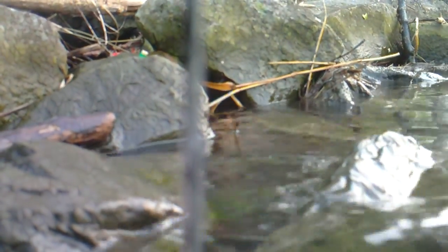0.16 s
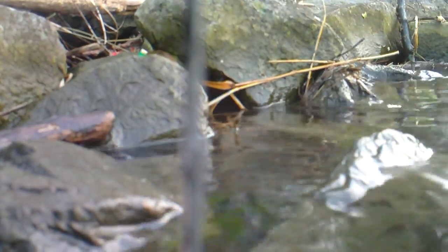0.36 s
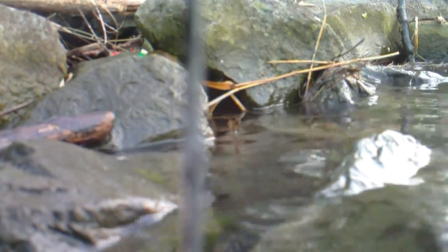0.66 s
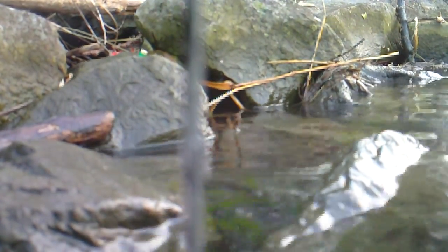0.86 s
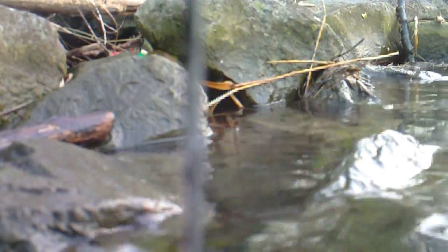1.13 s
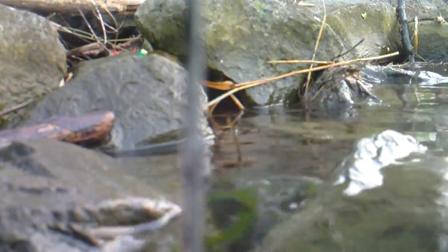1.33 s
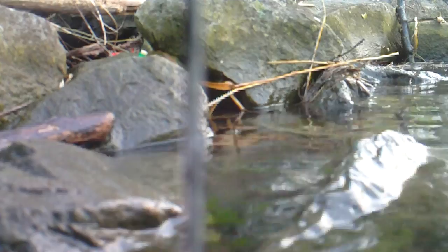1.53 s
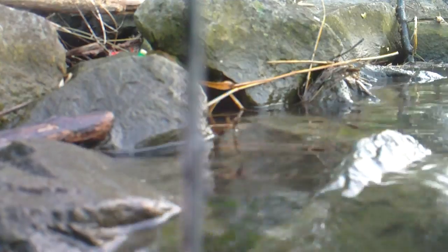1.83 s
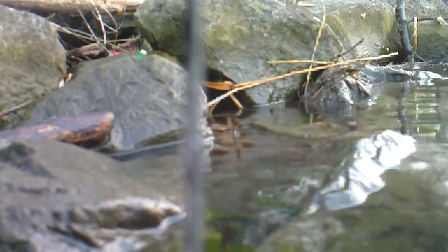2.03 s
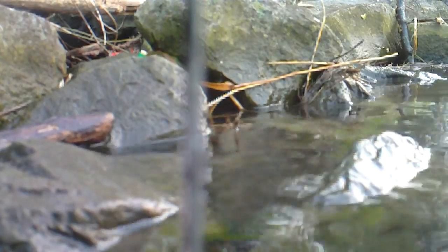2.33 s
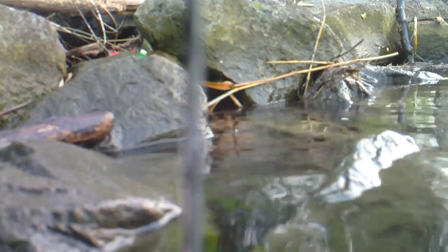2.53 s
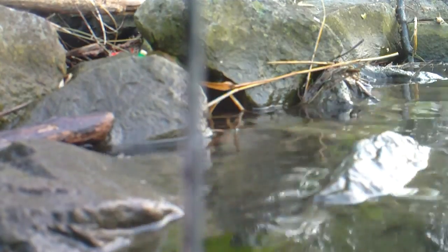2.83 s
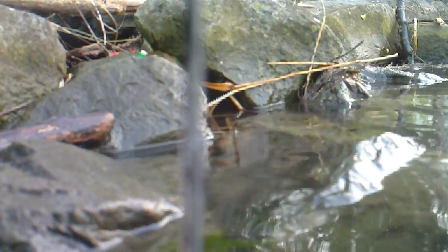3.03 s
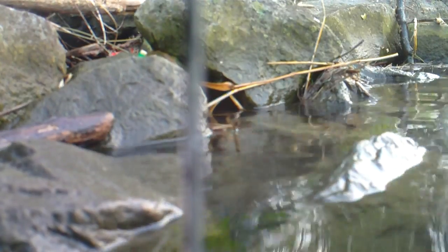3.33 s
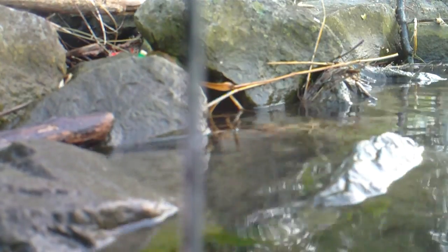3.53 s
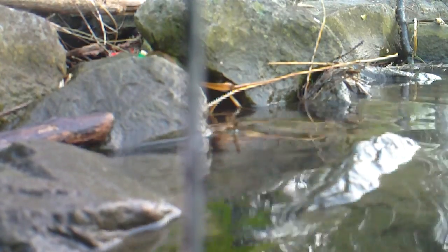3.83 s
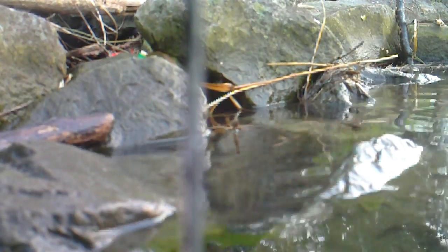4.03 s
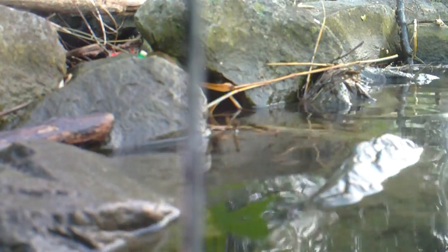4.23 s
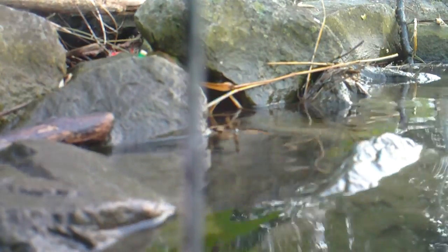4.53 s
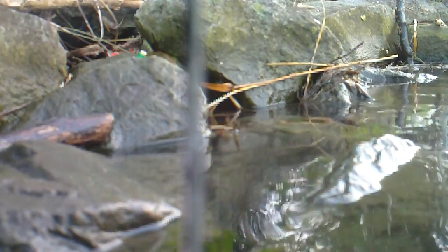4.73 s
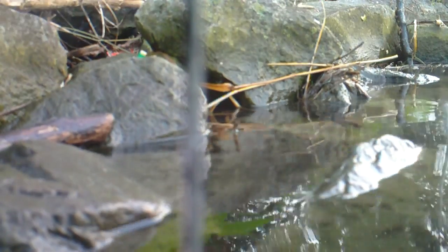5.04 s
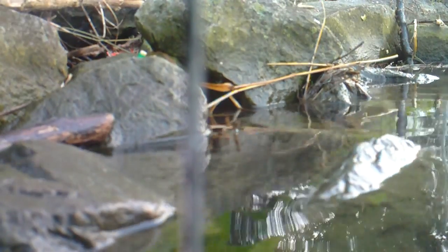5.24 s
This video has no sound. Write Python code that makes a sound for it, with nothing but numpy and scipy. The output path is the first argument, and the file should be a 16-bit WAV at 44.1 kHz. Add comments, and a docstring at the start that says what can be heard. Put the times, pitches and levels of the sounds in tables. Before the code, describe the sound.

A high electronic whine holds one pitch close by, fluttering slightly and ticking faintly. Under open air with a low rumble, nearby water laps unevenly among rocks, plopping, gurgling and splashing, with a few tiny bubble plinks. The waves get stronger around the middle as a faint low hum rises far off. Late on, a hollow float bumps the stones with a quick gulp of water, and the lapping settles.

```python
"""Small waves lap at a rocky bank: big bubbles gurgle, small ones splash and fizz as spray.
Slaps trap pockets of air, single bubbles plink, drops tick on stone.
Late on, a hollow float knocks against the bank and the water gulps shut behind it.
Close by, electronics whine near 1.6 kHz, with brief surges and faint ticking.
Behind lie a low outdoor rumble and, in the second half, a distant hum."""
import sys
import numpy as np
from scipy import signal
from scipy.io import wavfile
from scipy.ndimage import uniform_filter1d

SR = 44100
rng = np.random.default_rng(int(sys.argv[2]) if len(sys.argv) > 2 else 0)


def unload_audio(sound):
    """Save the sound as a 16-bit wav file, at the path given as the first command line argument."""
    columns = np.transpose(np.atleast_2d(sound))
    # keep every value between -1 and 1, then stretch to whole-number steps
    steps = np.round(np.clip(columns, -1, 1) * 32767)
    wavfile.write(sys.argv[1], SR, steps.astype(np.int16))


N = 237699
TIME_S = np.arange(N) / SR

# waves at the bank: (crest [s], length [s], gurgle [dB], splash [dB], spray [dB])
WAVES = [(0.84, 0.12, -42, -72, -69), (1.002, 0.034, -50, -54.5, -61), (1.093, 0.32, -40.5, -69, -66),
         (1.616, 0.55, -41.5, -66, -66), (2.011, 0.17, -40, -61, -60.5), (2.161, 0.098, -32, -59.5, -56),
         (2.383, 0.32, -39.5, -62, -61), (2.59, 0.18, -40, -62, -62), (2.803, 0.24, -34.5, -52, -58.5),
         (2.902, 0.11, -29, -45, -44), (3.023, 0.094, -34, -53, -53.5), (3.135, 0.6, -42, -58.5, -61.5),
         (3.433, 0.2, -37, -56, -62), (3.53, 0.1, -35.5, -46, -47.5), (3.584, 0.058, -28, -61, -61),
         (3.823, 0.083, -38, -53, -48), (3.866, 0.13, -25.5, -47.5, -51.5), (4.063, 0.061, -34, -56, -60),
         (4.184, 0.34, -44, -62, -65), (4.313, 0.12, -34, -52.5, -47.5), (4.407, 0.15, -37, -52.5, -54.5),
         (4.638, 0.057, -25.5, -55, -63)]
# water between waves: (gurgle [dB], splash [dB], spray [dB])
CALM_DB = (-54.5, -75.5, -80.5)
# bubble spectra: (frequency [Hz], relative density [dB])
GURGLE_SPECTRUM = [(130, -0.5), (220, -2.5), (400, 3), (580, -0.5), (850, -12.5), (1300, -29.5),
                   (1800, -27), (2300, -17.5), (3200, -60)]
SPLASH_SPECTRUM = [(900, 6), (1400, -1), (2200, -2.5), (2900, 0.5), (4000, 4.5), (4900, -8.5), (5700, -8),
                   (7500, -8.5)]
SPRAY_SPECTRUM = [(4500, -3), (6000, -13), (7800, -0.5), (9800, -5.5), (11500, -1), (13000, 2),
                  (15500, -19)]
# hollows between stones: (centre [Hz], width [Hz], added gain [ratio])
HOLLOWS = [(1110, 62, 0.46), (1270, 40, 1.7), (2136, 160, 1.03), (4920, 260, 0.6), (9130, 590, 0.28)]
# whine harmonics: (multiple [ratio], level [dB])
WHINE_HARMONICS = [(1, -36), (2, -51.5), (3, -71), (4, -74.5), (5, -75), (6, -74)]
# whine surges: (time [s])
SURGES_S = [0.277, 0.563, 0.763, 1.022, 1.071, 1.378, 1.825, 2.168, 2.258, 2.586, 2.935, 3.055, 4.836,
            4.947, 5.187]
# thin tones beside the whine: (frequency [Hz], level [dB])
THIN_TONES = [(8079, -71.5), (11089, -61)]
# outdoor air: (frequency [Hz], relative band gain [dB])
RUMBLE_SPECTRUM = [(20, -15.5), (40, -0.5), (80, -2.5), (130, -11), (300, -16), (600, -26), (1200, -31),
                   (2300, -37.5), (3700, -43.5), (6000, -46), (8500, -45.5), (10500, -39), (12500, -44),
                   (15500, -48)]
# slaps trapping air: (time [s], level [dB], pocket pitch [Hz])
SLAPS = [(0.765, -29, 493), (0.825, -22.5, 416), (1.604, -28, 550), (1.652, -27, 382), (2.076, -26.5, 416),
         (2.128, -20.5, 353), (2.16, -15, 290), (2.804, -16, 423), (2.851, -19, 513), (2.884, -28, 480),
         (3.039, -31, 437), (3.069, -20.5, 410), (3.101, -23, 534), (3.346, -19.5, 500), (3.378, -20, 464),
         (3.403, -22, 340), (3.54, -20, 570), (3.588, -12, 550), (3.858, -19, 336), (3.869, -14, 487),
         (4.056, -23.5, 416), (4.275, -21.5, 527), (4.296, -30, 452), (4.606, -16, 490),
         (4.623, -13.5, 377)]
# single bubbles: (time [s], level [dB], pitch [Hz])
PLINKS = [(0.995, -35, 4400), (2.798, -31, 3650), (2.861, -26, 4720), (2.869, -28, 4700),
          (2.88, -22.5, 4630), (2.905, -28, 4800), (2.998, -34, 2160), (3.069, -27, 3300),
          (3.345, -28.5, 910), (3.439, -32, 1900), (3.516, -30, 2210), (3.897, -24.5, 1300)]
# drops on stone: (time [s], level [dB])
DROPS = [(1.2057, -36), (1.2794, -37), (1.3766, -36.5), (1.4421, -33.5), (2.904, -30.5), (2.9806, -30),
         (2.9971, -25), (3.0678, -22.5), (3.1265, -31), (3.1387, -33), (4.1455, -30), (4.2132, -36),
         (4.3807, -25), (4.5052, -34), (4.6052, -34)]
# distant hum: (time [s], level [dB])
HUM_CURVE = [(2.6, -75), (3.3, -55), (4.3, -48.5), (4.8, -46), (5.39, -49)]
# float contacts: (time [s], level [dB], hardness cutoff [Hz])
KNOCKS = [(4.621, -16.5, 500), (4.628, -21, 1810), (4.6364, -16.5, 2000), (4.642, -37, 2020),
          (4.661, -17, 660)]
# hollow float body: (frequency [Hz], gain [dB], t60 [s])
FLOAT_MODES = [(94, -4.5, 0.13), (170, -6, 0.1), (300, -1.5, 0.14), (395, -6.5, 0.028), (655, 1.5, 0.014),
               (930, -7.5, 0.02), (1154, -2.5, 0.023), (1874, -10.5, 0.026), (2110, -10.5, 0.017)]
# cavities behind the float: (time [s], level [dB], start pitch [Hz], initial fall [Hz/s], t60 [s])
GULPS = [(4.660, -11.5, 331, 3020, .12), (4.689, -15, 278, 4000, 0.043)]


def from_db(db):
    """Decibels to gain."""
    return 10 ** (np.asarray(db) / 20)


def unit_rms(x):
    """Scale to rms 1."""
    return x / np.sqrt(np.mean(x ** 2) + 1e-20)


def db_at(spectrum, hz):
    """Read a spectrum on a log-frequency axis."""
    points_hz, points_db = np.transpose(spectrum)
    return np.interp(np.log(hz), np.log(points_hz), points_db)


def drift(rate_hz):
    """Slow random wander, rms about 1."""
    hop, settle = 40, 2000
    pole = np.exp(-2 * np.pi * rate_hz * hop / SR)
    noise = rng.standard_normal(N // hop + settle + 2)
    slow = signal.lfilter([1], [1, -2 * pole, pole ** 2], noise)[settle:]
    return np.interp(np.arange(N) / hop, np.arange(len(slow)), unit_rms(slow))


def filtered(x, hz, kind, order=2):
    """Causal Butterworth filter."""
    sos = signal.butter(order, np.clip(hz, 10, .45 * SR), kind, fs=SR, output="sos")
    return signal.sosfilt(sos, x + 1e-18)


def ring(clicks, hz, t60_s):
    """Resonator: a unit click starts a decaying unit sine."""
    r, w = 1000 ** (-1 / (t60_s * SR)), 2 * np.pi * hz / SR
    return signal.lfilter([0, np.sin(w)], [1, -2 * r * np.cos(w), r * r], clicks + 1e-18)


def tone(hz, rms_db, wander_hz):
    """Sine with slight pitch wander."""
    pitch_hz = hz + wander_hz * drift(1.8)
    return np.sqrt(2) * from_db(rms_db) * np.sin(2 * np.pi * np.cumsum(pitch_hz) / SR)


def add(out, start_s, sound):
    """Mix a short sound in at start_s."""
    i = round(start_s * SR)
    out[i:i + len(sound)] += sound[:N - i]


def bubbles(spectrum, per_s, spread_db, t60_cycles, swarm_db, pitches):
    """Bubbles of random strength and timing ring, each pitch in swarms; rms 1."""
    out = 0
    for hz in np.geomspace(spectrum[0][0], spectrum[-1][0], pitches):
        strength = from_db(spread_db * np.minimum(rng.exponential(1, N), 3)) * rng.choice([-1, 1], N)
        born = rng.random(N) < per_s / pitches / SR
        swarm = from_db(swarm_db * np.clip(drift(12), -2, 1.5))
        rings = filtered(ring(strength * born * swarm, hz, t60_cycles / hz), hz / 2, "high")
        out += from_db(db_at(spectrum, hz)) * np.sqrt(hz) * unit_rms(rings)
    return unit_rms(out)


def wave_envelope(crest_s, length_s, build_share=0.55, edge_db=-15):
    """One wave builds to gain 1 at its crest, then drains."""
    phase = (TIME_S - crest_s) / length_s
    return from_db(edge_db * np.maximum(-phase / build_share, phase / (1 - build_share)))


def lapping(gurgle_db=-1, splash_db=4.5, spray_db=7):
    """Big bubbles gurgle with each wave; small ones splash and fizz where it breaks."""
    power = from_db(CALM_DB)[:, None] ** 2
    for crest_s, length_s, *levels_db in WAVES:
        power = power + np.outer(from_db(levels_db), wave_envelope(crest_s, length_s)) ** 2
    gurgle, splash, spray = np.sqrt(power)
    gurgle *= bubbles(GURGLE_SPECTRUM, per_s=1800, spread_db=2, t60_cycles=10.8, swarm_db=-.5, pitches=16)
    splash *= bubbles(SPLASH_SPECTRUM, per_s=3200, spread_db=3.5, t60_cycles=22, swarm_db=2, pitches=16)
    spray *= bubbles(SPRAY_SPECTRUM, per_s=5000, spread_db=4.2, t60_cycles=24, swarm_db=3, pitches=14)
    return from_db(gurgle_db) * gurgle + from_db(splash_db) * splash + from_db(spray_db) * spray


def hollows(water):
    """Gaps in the bank resonate with the water."""
    out = water
    for hz, width_hz, gain in HOLLOWS:
        r, w = np.exp(-np.pi * width_hz / SR), 2 * np.pi * hz / SR
        resonance = signal.lfilter([1, 0, -1], [1, -2 * r * np.cos(w), r * r], water)
        out = out + gain * (1 - r * r) / 2 * resonance
    return out


def whine(pitch_hz=1602.6, surge_s=0.021, surge_db=1.63, flutter_db=0.42, swell_db=1):
    """Electronics: clock-steady harmonics flutter and surge in level, beside two unrelated tones."""
    surging = sum((TIME_S > start_s) & (TIME_S < start_s + surge_s) for start_s in SURGES_S)
    surge = uniform_filter1d(surging.astype(float), size=200)
    drive = from_db(surge_db * surge + flutter_db * drift(45))
    octave_db = swell_db * drift(2.8)
    harmonics = 0
    for multiple, db in WHINE_HARMONICS:
        amplitude = np.sqrt(2) * from_db(db + octave_db * (multiple == 2))
        harmonics += amplitude * np.sin(2 * np.pi * (multiple * pitch_hz * TIME_S + rng.random()))
    return drive * harmonics + sum(tone(hz, db, wander_hz=0.15) for hz, db in THIN_TONES)


def ticking(per_s=38, tick_db=-56, uneven_db=5, rebound_s=0.00373):
    """Ticks of uneven strength ring the device's housing; each rebounds once."""
    onsets = (np.arange(0, N / SR, 1 / per_s) * SR).astype(int)
    clicks = np.zeros(N)
    clicks[onsets] = from_db(tick_db + uneven_db * np.clip(rng.standard_normal(len(onsets)), -2, 1))
    clicks += .5 * np.roll(clicks, round(rebound_s * SR))
    return (ring(clicks, hz=2050, t60_s=.007) - ring(clicks, hz=2420, t60_s=.009)
            + ring(clicks, hz=2830, t60_s=.014))


def rumble(rms_db=-39.5, waver_db=2.5):
    """Outdoor noise in half-octave bands: wavering lows thin to a faint, steady hiss."""
    edges_hz = 20 * 2 ** np.arange(0, 10.1, .5)
    white = rng.standard_normal((2, N))
    air = 0
    for k, (low_hz, high_hz) in enumerate(zip(edges_hz, edges_hz[1:])):
        band_db = db_at(RUMBLE_SPECTRUM, np.sqrt(low_hz * high_hz))
        gain = from_db(band_db + waver_db * drift(14.4) * (low_hz < 1000))
        air += gain * filtered(white[k % 2], [low_hz, high_hz], "band", order=3)
    return from_db(rms_db) * unit_rms(air)


def slaps(gain_db=5, rise_s=0.00079, glide_per_s=1.5, churn_db=-17, churn_s=0.0049, cutoff_hz=1000):
    """A trapped air pocket rings, rising in pitch, under a burst of churned water."""
    out, t = np.zeros(N), TIME_S[:SR // 10]
    ref_cycles, ref_db, halving_db = 8.1, -21, 15
    for start_s, db, hz in SLAPS:
        t60_cycles = ref_cycles * 2 ** ((ref_db - db) / halving_db)  # harder slaps break up sooner
        pocket = np.sin(2 * np.pi * hz * t * (1 + glide_per_s * t)) * from_db(-60 * t * hz / t60_cycles)
        churn = unit_rms(filtered(rng.standard_normal(len(t)), [250, 1000], "band"))
        churn *= from_db(churn_db) * np.exp(-t / churn_s)
        attack = 1 - np.exp(-t / rise_s)
        add(out, start_s, from_db(db + gain_db) * attack * (pocket + churn))
    return filtered(out, cutoff_hz, "low")


def plinks(gain_db=-1, t60_cycles=34):
    """Single small bubbles ring briefly."""
    out, click = np.zeros(N), signal.unit_impulse(SR // 20)
    for start_s, db, hz in PLINKS:
        add(out, start_s, from_db(db + gain_db) * ring(click, hz, t60_cycles / hz))
    return out


def drops(gain_db=-4, rise_s=0.00051, decay_s=0.0032, highpass_hz=6500):
    """Drops hit stone: short, bright noise bursts."""
    out, t = np.zeros(N), TIME_S[:SR // 20]
    envelope = (1 - np.exp(-t / rise_s)) * np.exp(-t / decay_s)
    for start_s, db in DROPS:
        noise = unit_rms(filtered(rng.standard_normal(len(t)), highpass_hz, "high", order=1))
        add(out, start_s, from_db(db + gain_db) * envelope * noise)
    return out


def distant_hum(pitch_hz=176.4):
    """A far, slightly wavering tone comes up."""
    level_db = np.interp(TIME_S, *np.transpose(HUM_CURVE))
    return tone(pitch_hz, level_db + drift(1), wander_hz=0.83)


def float_knocks(scatter_db=1):
    """The float bumps the bank and rebounds; harder contacts reach its higher modes."""
    out, click = np.zeros(N), signal.unit_impulse(SR // 3)
    for start_s, db, hardness_hz in KNOCKS:
        body = 0
        for k, (hz, mode_db, t60_s) in enumerate(FLOAT_MODES):
            body += (-1) ** k * from_db(mode_db + rng.normal(0, scatter_db)) * ring(click, hz, t60_s)
        add(out, start_s, from_db(db) * filtered(body, hardness_hz, "low"))
    return out


def gulps(rise_s=0.0053):
    """Water closes behind the float; a cavity widens as it rings, so its pitch falls."""
    out, t = np.zeros(N), TIME_S[:SR // 5]
    for start_s, db, start_hz, fall_hz_per_s, t60_s in GULPS:
        pitch_hz = start_hz * np.exp(-fall_hz_per_s * t / start_hz)
        envelope = from_db(db - 60 * t / t60_s) * (1 - np.exp(-t / rise_s))
        add(out, start_s, envelope * np.sin(2 * np.pi * np.cumsum(pitch_hz) / SR))
    return out


def scene():
    """Mono mix, open air."""
    water = hollows(lapping()) + slaps() + plinks() + float_knocks() + gulps() + drops()
    return (water + whine() + ticking() + rumble() + distant_hum())[None]


def record(dry):
    """Steep elliptic low-pass."""
    cutoff_hz = 15450
    return signal.sosfilt(signal.ellip(12, .1, 90, cutoff_hz, fs=SR, output="sos"), dry)


dry = scene()
out = record(dry)
unload_audio(out)
```